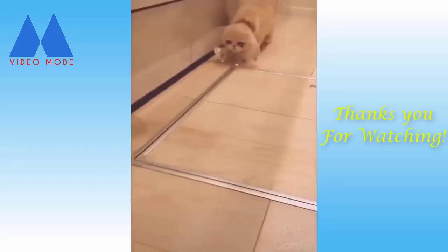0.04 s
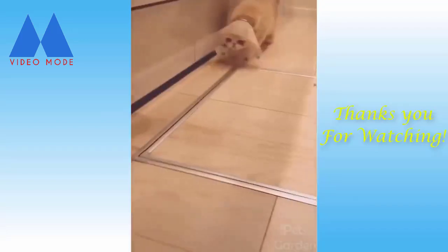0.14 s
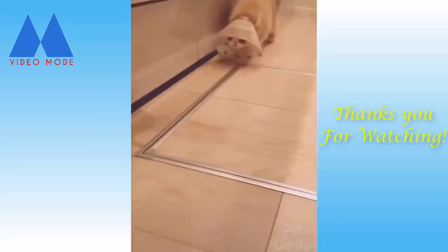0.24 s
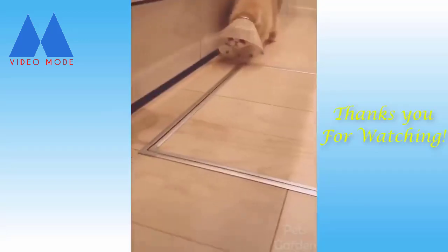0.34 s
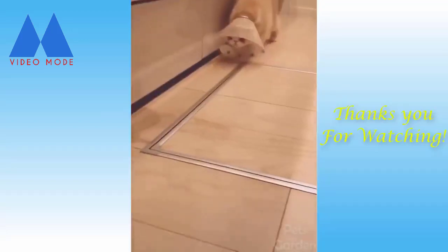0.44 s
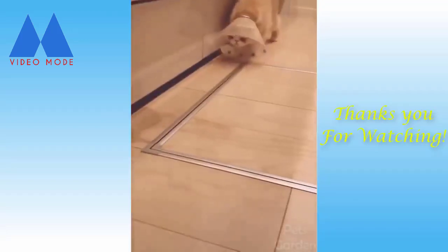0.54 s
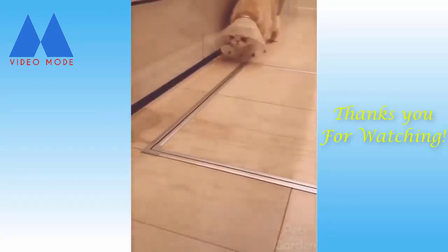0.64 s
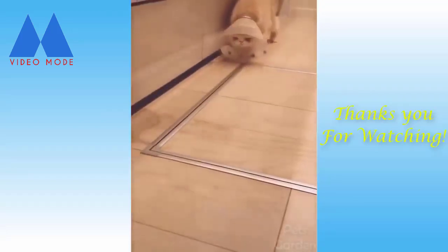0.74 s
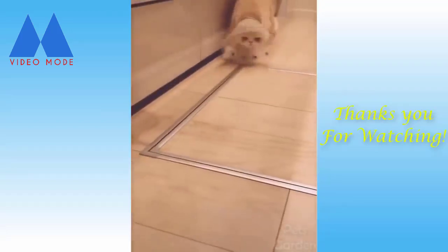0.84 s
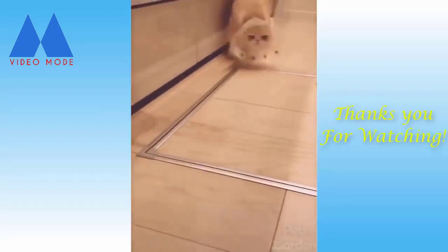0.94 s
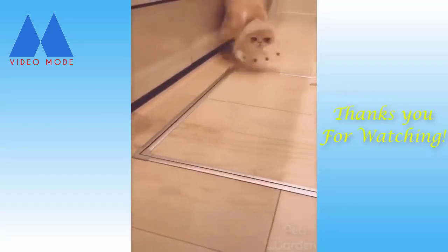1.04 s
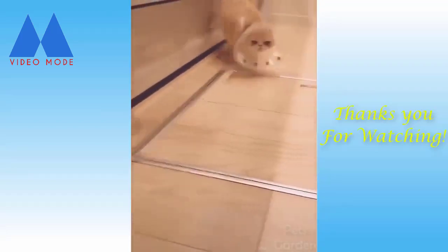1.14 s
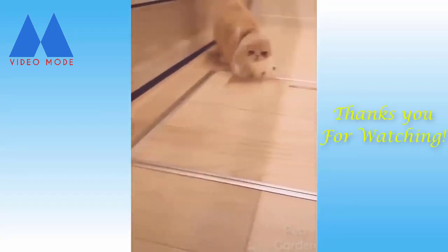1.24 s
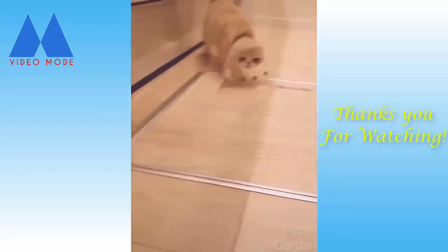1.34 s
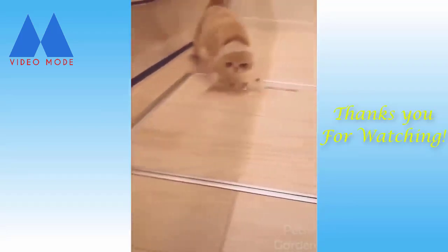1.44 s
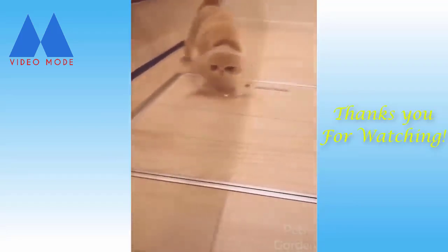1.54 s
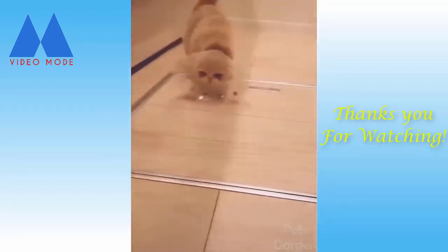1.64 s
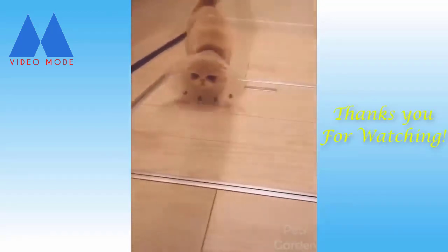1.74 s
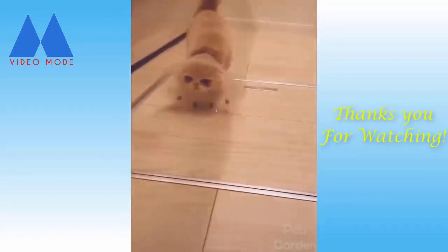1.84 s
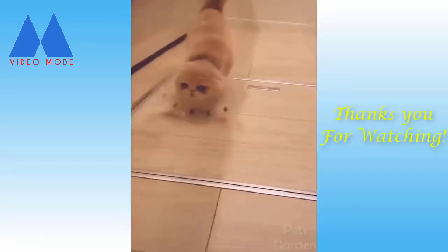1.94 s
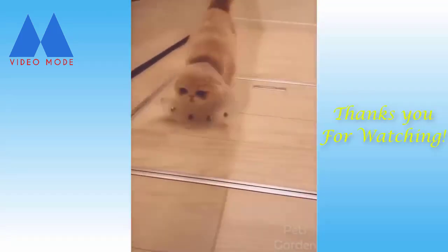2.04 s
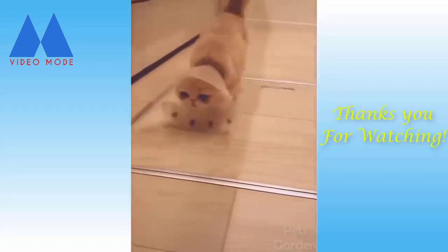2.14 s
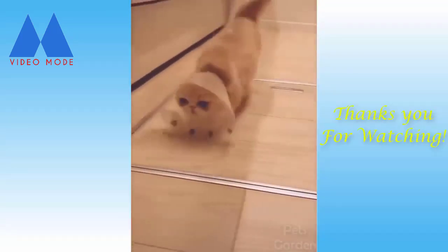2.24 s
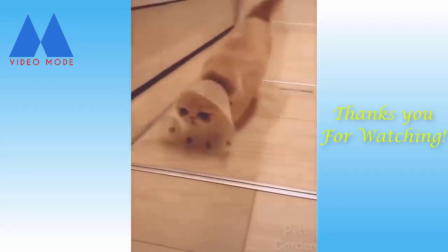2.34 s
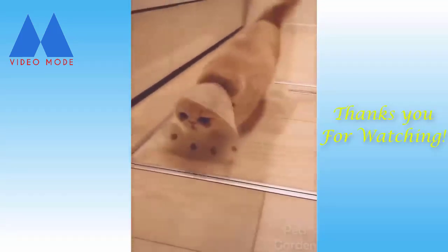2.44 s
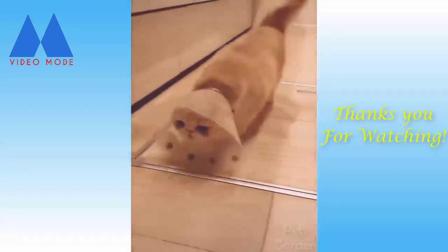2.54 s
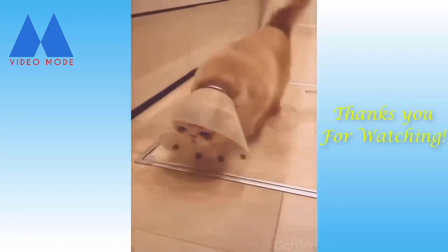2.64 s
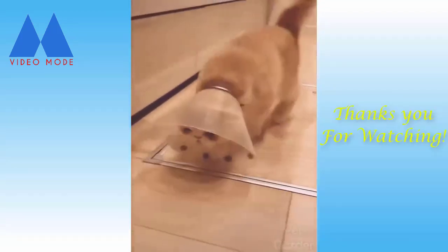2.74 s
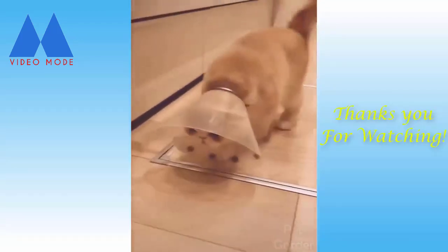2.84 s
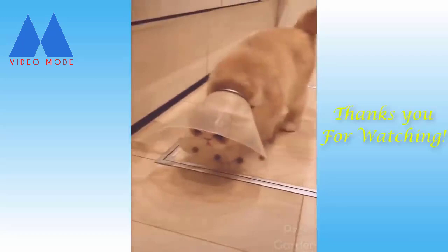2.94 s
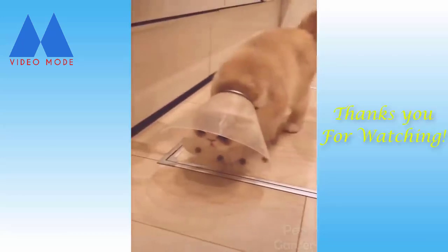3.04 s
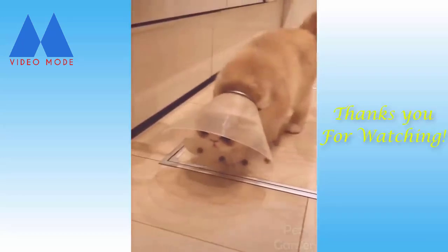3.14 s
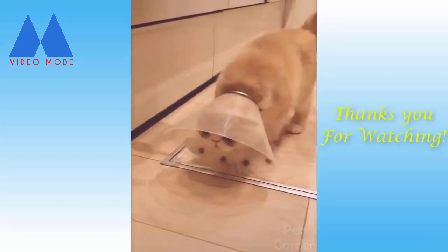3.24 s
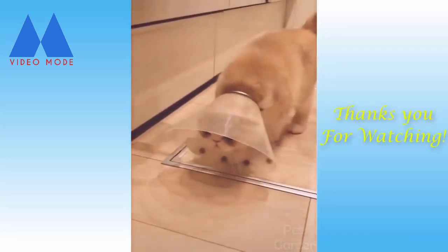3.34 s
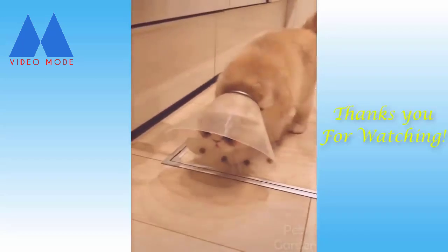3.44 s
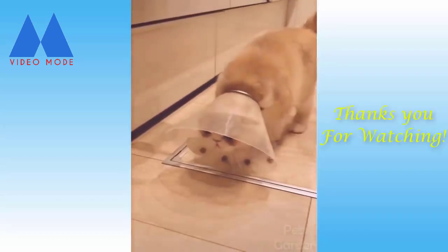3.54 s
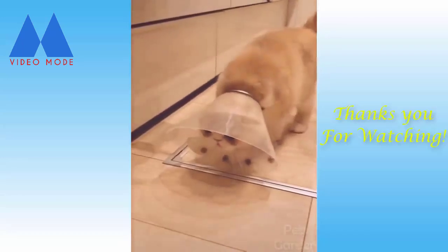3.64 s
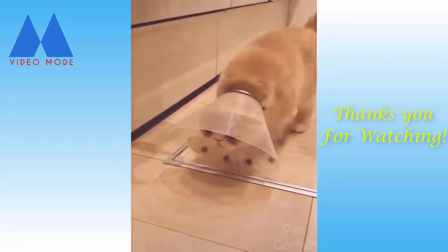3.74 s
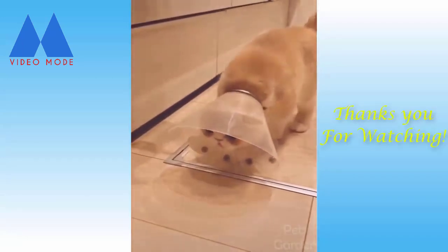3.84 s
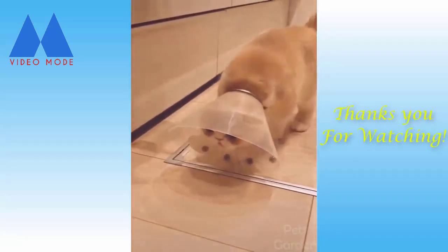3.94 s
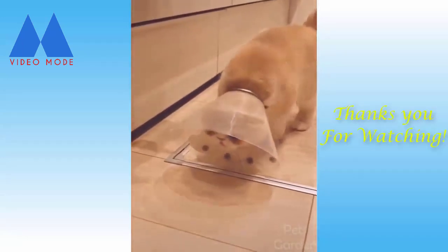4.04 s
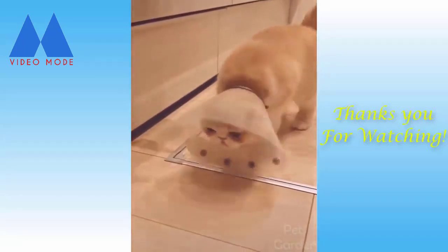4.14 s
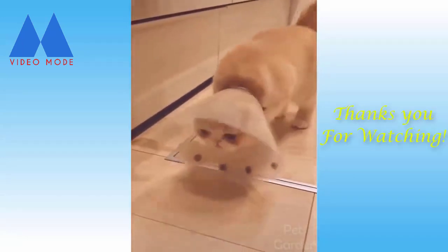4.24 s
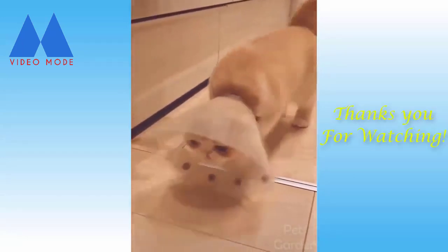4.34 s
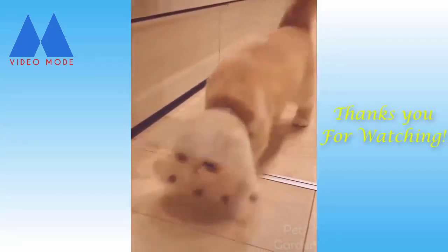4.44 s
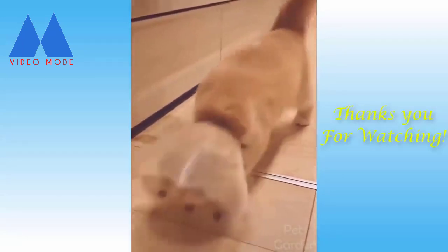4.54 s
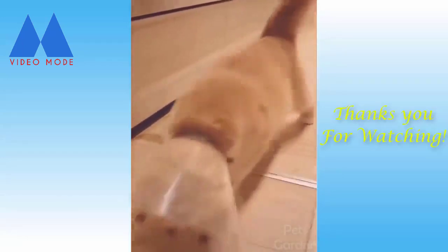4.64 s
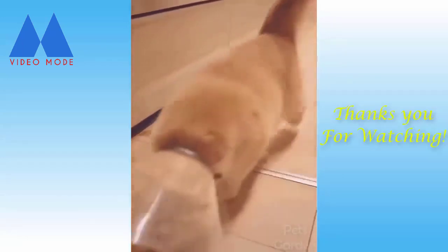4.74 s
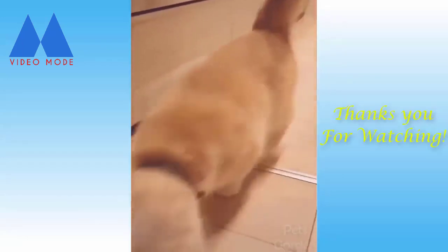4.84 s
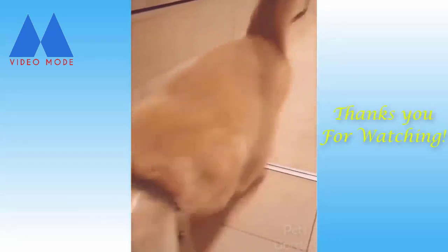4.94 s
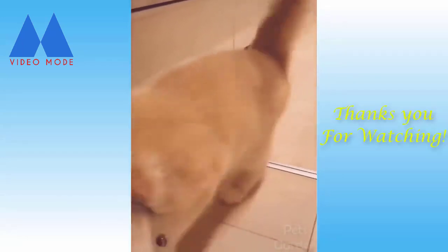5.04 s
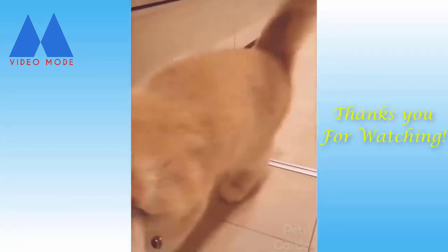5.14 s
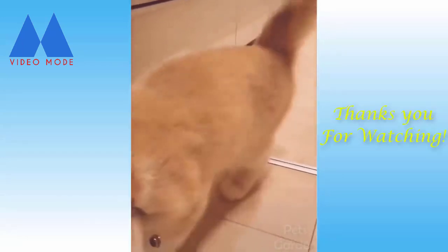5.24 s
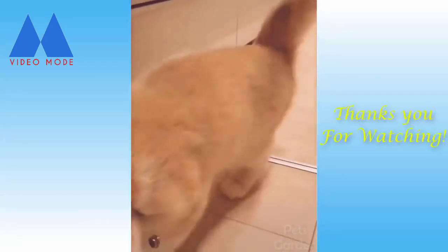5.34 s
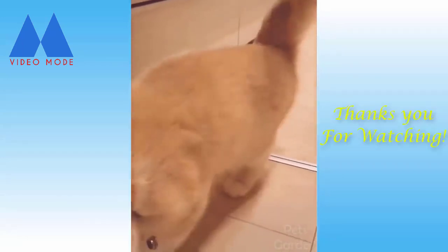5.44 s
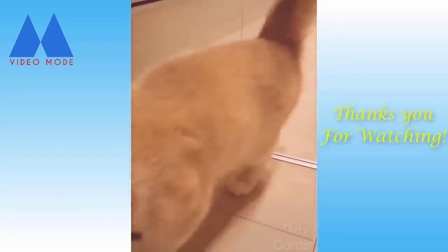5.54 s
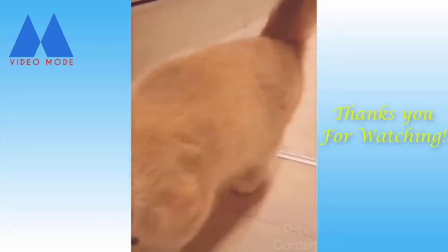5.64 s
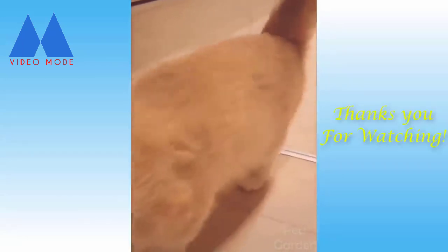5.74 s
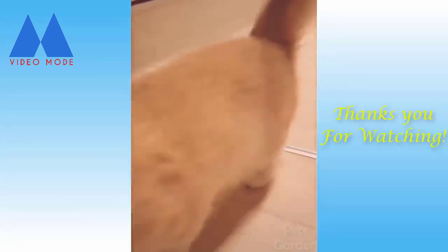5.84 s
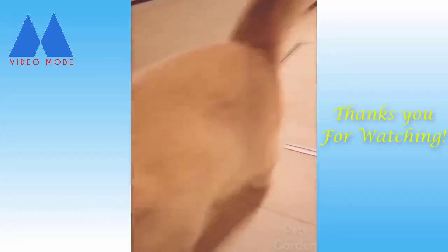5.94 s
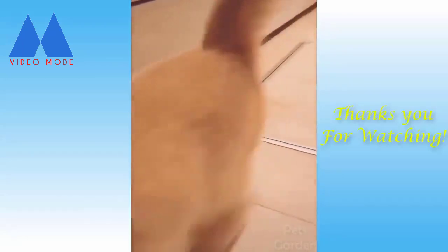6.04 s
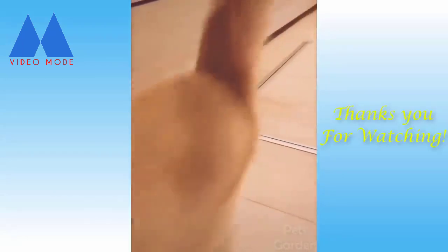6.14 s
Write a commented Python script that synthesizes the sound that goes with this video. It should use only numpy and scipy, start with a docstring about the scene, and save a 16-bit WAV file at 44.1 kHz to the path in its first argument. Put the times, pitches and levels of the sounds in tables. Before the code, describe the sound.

Hollow plastic knocks and gritty scraping of a cat's cone along floor tiles, with soft paw falls, a still gap, and a final flurry of cracks.

```python
"""A cat in a plastic cone collar on a tiled floor in a small hard room, over faint air and a wavering appliance hum.
The rim soon scrapes in short strokes: dense random slips, filtered as sheet, hollow, grit and whistle.
Noise bursts make the ticks and scuffs; knocks are waves crossing the sheet, ringing and, if hard, crackling after.
Soft paw falls are short damped tones. In a still gap between strokes a thin whine shows;
then clicks, scrapes and knocks return, and the background sinks towards the end."""
import sys
import numpy as np
from scipy import signal
from scipy.fft import rfft, irfft
from scipy.io import wavfile

SR = 44100
rng = np.random.default_rng(int(sys.argv[2]) if len(sys.argv) > 2 else 0)


def to_wav(s):
    """Save 16-bit WAV."""
    ch = np.atleast_2d(s).T  # columns
    pcm = np.round(np.clip(ch, -1, 1) * 32767)  # PCM
    wavfile.write(sys.argv[1], SR, pcm.astype(np.int16))


N = 273017
TIME = np.arange(N) / SR

# blows on the cone: start_s, thump_db, thump_hz, crack_db, crack_hz (relative levels),
# tension (factor on the ringing modes), wait_s (until the rim lands again)
BLOWS = [(0.2659, 21.5, 490.2, -5.5, 3100, 1.13, .026), (1.5188, -0.5, 700, -9, 2120, 1.4, .008),
         (1.73, -8.5, 510, -14, 1980, 1.2, .011), (2.0968, 0.5, 720, -3, 1670, 0.97, 0.012),
         (2.8053, 28.5, 400, 16.5, 2180, 1.035, 0.0096), (4.325, 2, 646, -15, 1905, 1.15, 0.0091),
         (4.819, 21.5, 431, 11, 1110, 1.35, .0115), (4.8205, 9, 607, 2.5, 2450, 0.8, 0.01),
         (5.1743, 23, 396, 0, 2170, .97, .0176), (5.652, -11, 302, -47.5, 1514, 1.06, .007),
         (5.7117, -4.5, 606, -8, 2040, 1.06, 0.0098)]


def amp(db):
    """Decibels to gain."""
    return 10 ** (np.asarray(db) / 20)


def unit(x):
    """Scales to rms 1."""
    return x / np.sqrt(np.mean(x ** 2) + 1e-20)


def read(points, hz):
    """Reads a spectrum on a log-frequency axis."""
    f, value = np.transpose(points)
    return np.interp(np.log(hz + 1), np.log(f + 1), value)


def add(mix, s, sound):
    """Mixes a sound in at time s."""
    part = mix[max(round(s * SR), 0):][:len(sound)]
    part += sound[:len(part)]


def colour(x, points, size=2048):
    """Causal minimum-phase filter with the given spectrum shape and unit energy."""
    hz = abs(np.fft.fftfreq(size, 1 / SR))
    log_gain = np.log(amp(read(points, hz)))
    # the Hilbert transform of the log gain gives the phase
    spectrum = np.exp(np.conj(signal.hilbert(log_gain)))
    kernel = np.fft.ifft(spectrum).real
    return signal.oaconvolve(x, kernel / np.linalg.norm(kernel))[:len(x)]


def drift(rate_hz):
    """Random motion of rms 1, lowpassed around the given rate."""
    hz = np.fft.rfftfreq(N, 1 / SR)
    spectrum = rfft(rng.standard_normal(N)) * np.exp(-(hz / rate_hz) ** 2)
    return unit(irfft(spectrum, N))


def hump(hz, centre_hz, octaves):
    """A bell on a log-frequency axis."""
    return np.exp(-.5 * (np.log2((hz + 1) / centre_hz) / octaves) ** 2)


def tail(t60, start, size=22050, count=15):
    """Sparse echoes of random sign, each band dying at its own speed; unit energy."""
    taps = np.zeros(size)
    at = np.arange(int(start * SR), size - count, count)
    taps[at + rng.integers(0, count, len(at))] = rng.choice([-1., 1.], len(at))
    hz, t, bands = signal.stft(taps, SR, nperseg=128)
    decay = amp(-60 * t / read(t60, hz)[:, None])
    echoes = signal.istft(bands * decay, SR, nperseg=128)[1]
    return echoes / np.linalg.norm(echoes)


def background():
    """Noise for room air, wavering tones for the hum, and a thin whine heard while the cat stands still."""
    # colour of the room air: frequency_hz, relative_level_db
    air_spectrum = [(18, -43), (30, -14), (49, -4), (85, -3.5), (169, -1), (400, -9.5), (432, -12),
                    (649, -10.5), (926, -20.5), (1020, -16.5), (4360, -29), (6070, -32), (13000, -36.5)]
    # level of the whole background: time_s, gain_db
    background_level = [(0, -3), (.5, 3), (4.2, 1.5), (5.15, -1.5), (5.85, -8)]
    # hum tones ahead of that gain: frequency_hz, level_db
    hum_tones = [(59.2, -75.5), (100, -80), (403.7, -84), (651.4, -82.5)]

    air = amp(-68) * unit(colour(rng.standard_normal(N), air_spectrum, size=8192))
    air = air * amp(0.18 * drift(8))
    hum = np.zeros(N)
    for hz, db in hum_tones:
        turns = np.cumsum(hz + 1.6 * drift(6)) / SR
        hum += amp(db) * unit(np.sin(2 * np.pi * turns))
    whine_turns = np.cumsum(5940 + 14 * drift(30)) / SR
    whine = amp(-92.5) * unit(np.sin(2 * np.pi * whine_turns))
    still = np.interp(TIME, [2.8, 3, 4.2, 4.5], [0, 1, 1, 0])
    gain_db = np.interp(TIME, *np.transpose(background_level))
    return (air + hum + whine * still) * amp(gain_db)


def scrape():
    """Slips excite the sheet under the stroke; grit brightens it, the hollow booms and a rim resonance whistles."""
    # sheet, hollow and grit colours: frequency_hz, relative_level_db
    sheet_spectrum = [(300, -20), (450, -18), (650, -1.5), (1000, -7), (1450, -0.5), (2000, 4),
                      (2600, -0.5), (3400, -5), (4200, -3.5), (5200, -4), (5900, -10), (7600, -11),
                      (8600, -22), (13000, -31)]
    hollow_spectrum = [(200, -15), (450, -15.5), (680, 1), (900, -3.5), (1200, -3), (1600, -8),
                       (3000, -28.5)]
    grit_spectrum = [(3000, -31), (6000, -7.5), (8000, 0), (10000, -2), (13000, -5)]

    force, grit_gain, whistle_gain, hollow_gain = rim_motion()
    judder = amp(0.6 * drift(41))
    sliding = rim_echoes(slips(5000, spread_db=1.0), depth=0.36, wander=.18)
    body = amp(-2.5) * force * unit(colour(sliding, sheet_spectrum))
    hollow = amp(-3.5) * hollow_gain * unit(colour(sliding, hollow_spectrum))
    grit = grit_gain * colour(slips(5000, spread_db=1.0), grit_spectrum)
    hz = np.fft.rfftfreq(N, 1 / SR)
    rim = irfft(rfft(slips(5000, spread_db=1.5)) * hump(hz, 3594, octaves=0.13), N)
    whistle = whistle_gain * unit(rim)
    return judder * (body + hollow + grit + whistle)


def rim_motion():
    """Strokes hold the rim on the floor and shoves speed it up: gains of the sheet, grit, whistle and hollow."""
    # strokes of the rim over the tiles: start_s, end_s, pressure_db (before shoves),
    # hollow_db (relative to the pressure)
    strokes = [(0.031, 0.119, -54, 0), (0.166, 0.26, -52.5, -2), (1.524, 2.446, -49.5, -4.5),
               (2.487, 2.801, -50, -2), (4.751, 5.168, -53, -3.5)]
    # each step shoves the cone on for a moment: centre_s, half_width_s (sigma of a bell),
    # surge_db, extra_grit_db, extra_whistle_db
    shoves = [(.1, 0.025, 2.5, 2.5, 6.5), (1.585, 0.055, 3.5, 14, 5), (1.67, .03, 1, 1, -2),
              (1.85, 0.047, 4, 7, 1.5), (2.13, 0.069, 5, 7.5, 3), (2.41, 0.025, 4, 2, 1),
              (2.53, 0.043, 5, 1, 3), (2.78, 0.04, 6.5, 3, -2), (4.796, 0.022, 8, 10.5, -4),
              (4.885, 0.042, 10, 13, 11), (5.094, 0.078, 5, 6, 13)]
    bite_s, let_go_s = 0.0089, .035  # the rim bites just before a stroke, lets go just after
    grit_db, whistle_db = -23, -14  # against the pressure, between shoves
    # the hollow grows less than the sheet in a surge (dB per dB, relative to the push)
    hollow_per_surge = -0.8
    wander_hz = 12  # the resonances come and go as the contact point moves

    surge_db, extra_grit_db, extra_whistle_db = np.zeros((3, N))
    for centre, width, surge, more_grit, more_whistle in shoves:
        bell = np.exp(-.5 * ((TIME - centre) / width) ** 2)
        surge_db += surge * bell
        extra_grit_db += more_grit * bell
        extra_whistle_db += more_whistle * bell

    force, hollow = np.zeros((2, N))
    for start, end, pressure_db, hollow_db in strokes:
        contact = np.interp(TIME, [start - bite_s, start, end, end + let_go_s], [0, 1, 1, 0])
        push = amp(pressure_db + surge_db) * contact
        force += push
        hollow += push * amp(hollow_db)
    grit = force * amp(grit_db + extra_grit_db)
    whistle = force * amp(whistle_db + extra_whistle_db + 2 * drift(wander_hz))
    hollow = hollow * amp(hollow_per_surge * surge_db + 2.5 * drift(wander_hz))
    return force, grit, whistle, hollow


def slips(per_s, spread_db):
    """Catches on the grain of the surface: dense clicks of uneven size and random sign."""
    size = amp(spread_db * np.minimum(rng.exponential(1, N), 4))
    size = size * rng.choice([-1., 1.], N)
    return unit(size * (rng.random(N) < per_s / SR))


def rim_echoes(x, depth, wander, count=6):
    """Echoes from the edges of the sheet shift as the contact point slides along the rim."""
    out = x.copy()
    for delay in np.geomspace(.0007, .007, count):
        moving_delay = delay * (1 + wander * drift(2.5))
        out += depth * np.interp(TIME - moving_delay, TIME, x)
    return unit(out)


def ticks(size=4096):
    """Each tick is a short burst of tiny slips in the plastic; long ones start softly."""
    # crisp clicks of the flexing collar, its soft rustles against fur, and dull scuffs as the rim
    # touches a tile: start_s, level_db (of the burst before colouring)
    clicks = [(2.481, -37.5), (2.852, -29.5), (2.91, -26), (4.3605, -35.5), (4.369, -42), (4.4112, -40.5),
              (4.6201, -34.5), (4.776, -38.5), (4.7826, -26.5), (5.272, -31.5), (5.286, -33.5),
              (5.313, -34), (5.348, -37.5), (5.7927, -50), (5.8556, -53.5)]
    rustles = [(.457, -48), (.474, -44.5), (.715, -48.5), (.998, -52.5), (1.032, -51), (1.315, -57),
               (1.435, -50.5)]
    scuffs = [(.17, -54.5), (.673, -54.5), (2.409, -45.5), (1.076, -52.5), (1.5175, -35), (4.3213, -44),
              (4.7451, -33.5), (5.695, -49.5), (5.701, -48), (5.708, -40), (5.724, -47)]
    # colours of the bright and dull parts: frequency_hz, relative_level_db
    bright_spectrum = [(300, -28), (1500, -11.5), (3800, 4), (5500, -4), (8000, -3.5), (13000, -11)]
    dull_spectrum = [(150, -19.5), (650, 6.5), (1500, -4), (3000, 0.5), (6000, -17.5), (13000, -36)]
    # each kind: rows, dull part against the bright part (dB), time to die by 60 dB (s)
    kinds = [(clicks, -7, 0.011), (rustles, -4, 0.094), (scuffs, 7.5, .03)]

    bright, dull = np.zeros((2, N))
    t = np.arange(size) / SR
    for rows, dull_db, length in kinds:
        age = t / length
        onset = 1 - np.exp(-age / 0.056)
        for s, db in rows:
            burst = amp(db - 60 * age) * onset * rng.standard_normal(size)
            add(bright, s, burst)
            add(dull, s, burst * amp(dull_db))
    return amp(-5.5) * (colour(bright, bright_spectrum) + colour(dull, dull_spectrum))


def knocks():
    """Each blow and its softer rebound, with the waves that bounce back and forth in the sheet."""
    # decay of the bouncing waves: frequency_hz, t60_s
    sheet_t60 = [(100, 0.083), (600, 0.13), (2000, 0.026), (12000, 0.04)]
    travel = 0.0045  # s the 500 Hz bending wave takes to cross the sheet

    out = np.zeros(N)
    for s, thump_db, thump_hz, crack_db, crack_hz, tension, wait in BLOWS:
        snap_db = -12 + .6 * crack_db  # the treble snap grows with the crack
        # the second landing is softer and its thump lower
        for at, db, pitch in [(s, 0, 1), (s + wait, -10, 0.57)]:
            wave = knock(thump_db + db, thump_hz * pitch, crack_db + db, crack_hz,
                         snap_db + db, travel, tension)
            bounces = signal.fftconvolve(wave, tail(sheet_t60, start=.003))[:len(wave)]
            add(out, at, wave + amp(-13.5) * bounces)
    return out


def knock(thump_db, thump_hz, crack_db, crack_hz, snap_db, travel, tension, size=16384):
    """A bending wave crosses the thin sheet, treble first; the rim rattles and the cone is left ringing."""
    # ringing modes of the cone: frequency_hz (before tension), relative_level_db, t60_s
    cone_modes = [(120, 5.5, 0.21), (146.3, 3.5, 0.59), (167.2, 3.5, .2), (205.9, 4.5, 0.23),
                  (260, -3.5, 0.18), (325, 3.5, 0.066), (345, -1.5, .18), (426.2, -7.5, 0.099),
                  (480, -10, 0.082), (562, -13.5, 0.2), (633.6, -1, .2), (697, -0.5, 0.28),
                  (700, -1.5, 0.57), (757, -5, 0.18), (800, -8.5, 0.28)]

    hz, t = np.fft.rfftfreq(size, 1 / SR), np.arange(size) / SR
    # bending waves travel at a speed that grows with the root of frequency
    crossing = np.exp(-4j * np.pi * travel * np.sqrt(500 * hz))
    ratio = hz / thump_hz
    rolloff = np.sqrt(1 + ratio ** 4.8 + (ratio / 1.26) ** 11)
    thump = amp(thump_db + 1.5) * ratio ** 1.28 / rolloff
    rough = 0.65 + 0.61 * rfft(rattle(t60=0.016), size)  # one clean hit plus rattling
    crack = amp(crack_db) * hump(hz, crack_hz, octaves=0.44) * rough
    snap = amp(snap_db) * hump(hz, 4100, octaves=0.82) * rfft(rattle(t60=0.051), size)
    wave = irfft((thump + crack + snap) * crossing)
    ring = np.zeros(size)
    for f, db, t60 in cone_modes:
        decay = np.exp(-np.log(1000) * t / t60)
        ring += amp(db) * decay * np.sin(2 * np.pi * f * tension * t)
    return wave + amp(-68.5) * signal.fftconvolve(wave, ring)[:size]


def rattle(t60, size=4096):
    """A dying burst of tiny contacts, of unit energy."""
    burst = rng.standard_normal(size) * amp(-60 * np.arange(size) / SR / t60)
    return burst / np.linalg.norm(burst)


def crinkle(per_s=1100, length=0.125):
    """After a hard snap the bent sheet crackles as it settles back into shape."""
    # colour of the crackle: frequency_hz, relative_level_db
    crinkle_spectrum = [(500, -14.5), (2000, -1.5), (3800, 3), (5500, -5.5), (8000, -4.5), (10000, -9),
                        (13000, -10)]

    strain = np.zeros(N)
    for s, thump_db, *_ in BLOWS:
        if thump_db > 10:  # hard blows only
            # outside these points the first and last values hold
            settling = np.interp(TIME - s, [0, .006, length / 2, length], [0.003, 0.99, 0.28, 0.00086])
            strain += amp(0.83 * thump_db) * settling
    return amp(-65.5) * strain * colour(slips(per_s, spread_db=1.5), crinkle_spectrum)


def paws(size=4096):
    """Each soft pad gives the floor a short, heavily damped push."""
    # paw falls on the tiles: start_s, envelope_peak_db, pitch_hz
    paw_falls = [(0.576, -51.5, 138), (0.799, -51.5, 230), (1.077, -51.5, 263), (1.468, -53, 73.5),
                 (1.547, -50, 58), (4.336, -51, 119), (4.835, -30, 102), (5.714, -43, 157)]

    out, t = np.zeros(N), np.arange(size) / SR
    for s, db, hz in paw_falls:
        swell = t * hz / 0.46
        envelope = swell * np.exp(1 - swell)
        add(out, s, amp(db) * envelope * np.sin(2 * np.pi * hz * t))
    return out


def scene():
    """The cat and its cone with the echoes of a small hard room; the background joins without echoes."""
    # reverberation of the room: frequency_hz, t60_s
    room_t60 = [(100, .3), (500, 0.3), (2000, 0.33), (5000, 0.39), (12000, 0.31)]

    cat = scrape() + ticks() + knocks() + crinkle() + paws()
    room = signal.oaconvolve(cat, tail(room_t60, start=.008))[:N]
    return (cat + amp(-13.0) * room + background())[None]


def record(dry):
    """The microphone loses the deep bass below 45 Hz; then a steep lowpass limits the band at 13230 Hz."""
    bass_cut = signal.butter(2, 45, "high", fs=SR, output="sos")
    thin = signal.sosfilt(bass_cut, dry)
    band_limit = signal.firwin(401, 13230, window=("kaiser", 8), fs=SR)
    return signal.oaconvolve(thin, band_limit[None], "same")


dry = scene()
out = record(dry)
to_wav(out)
```